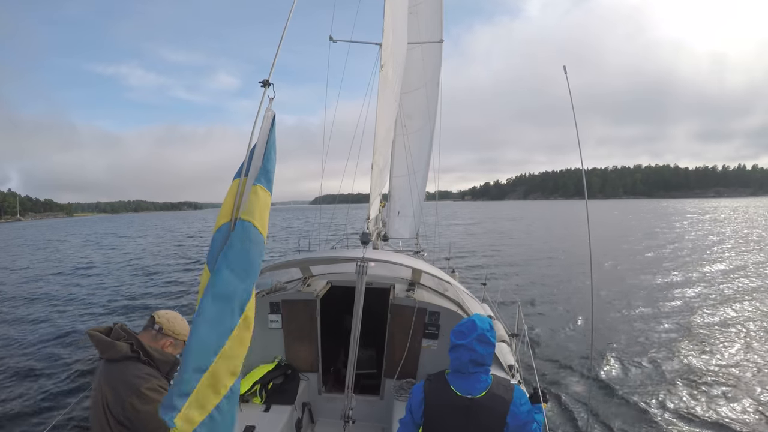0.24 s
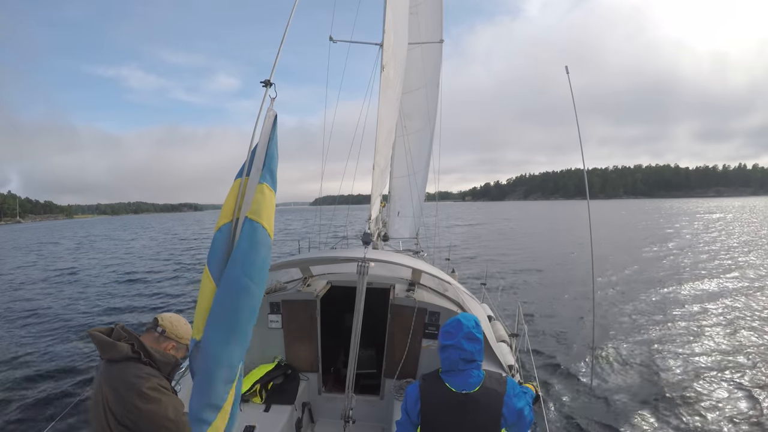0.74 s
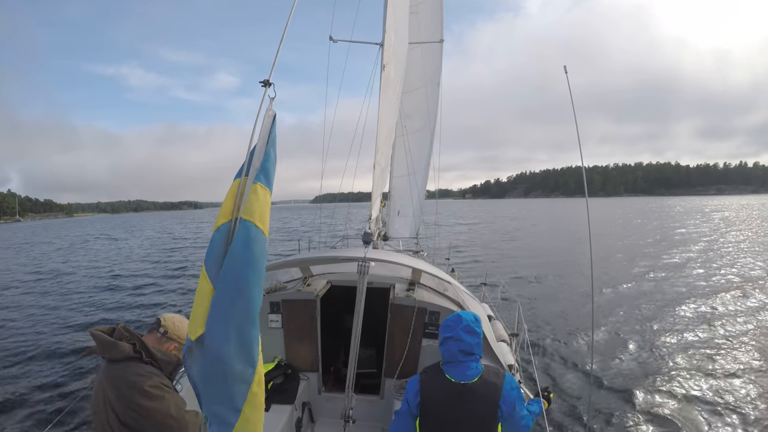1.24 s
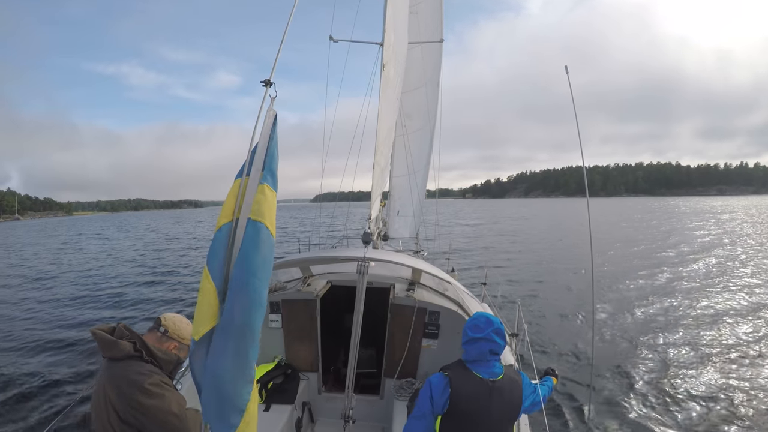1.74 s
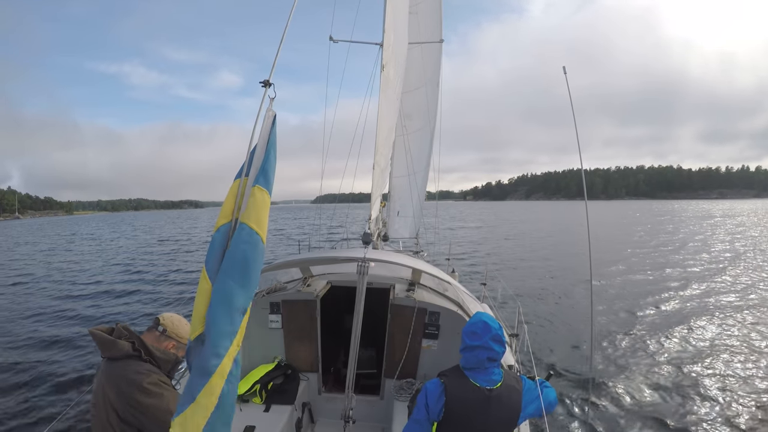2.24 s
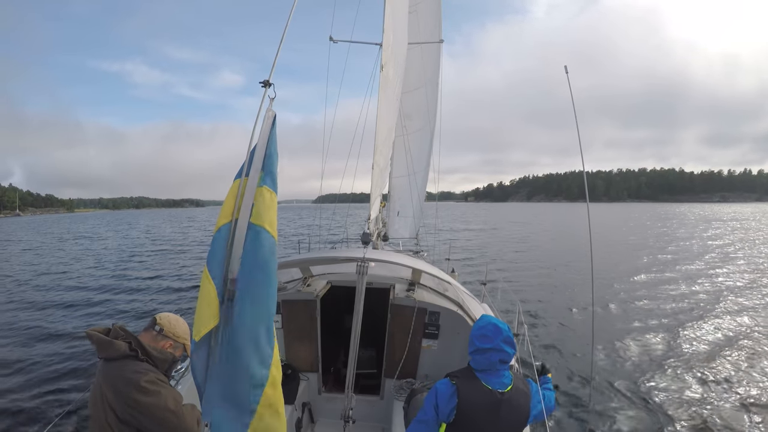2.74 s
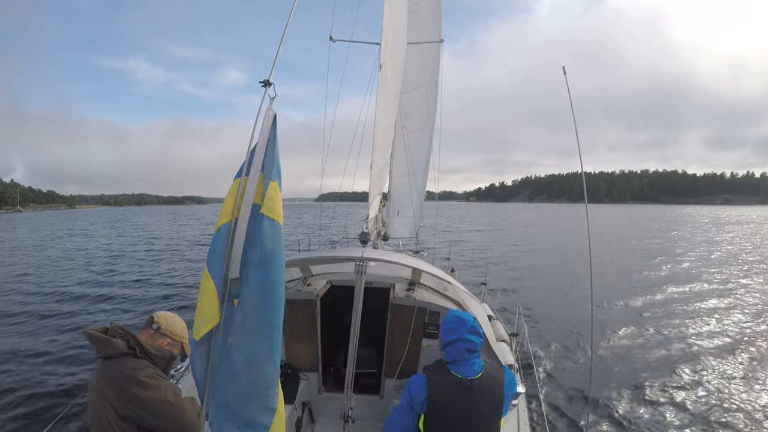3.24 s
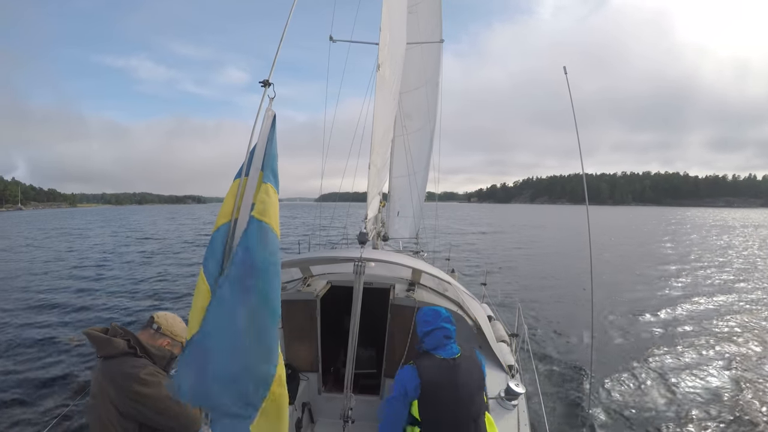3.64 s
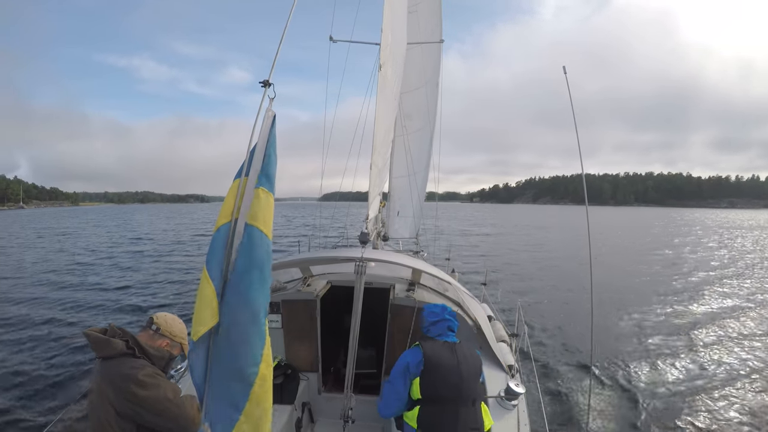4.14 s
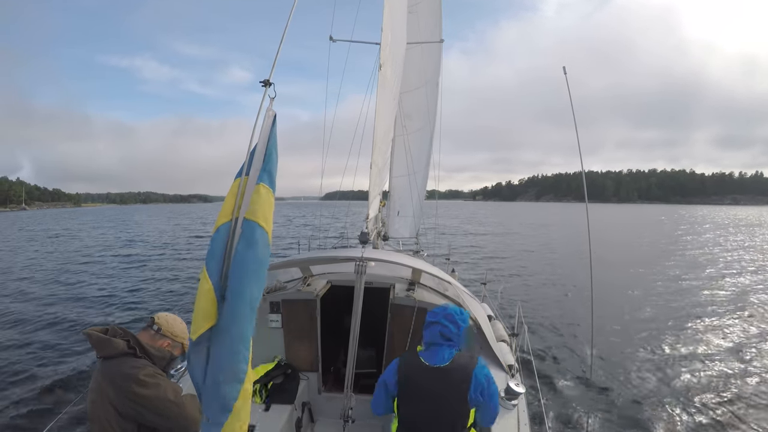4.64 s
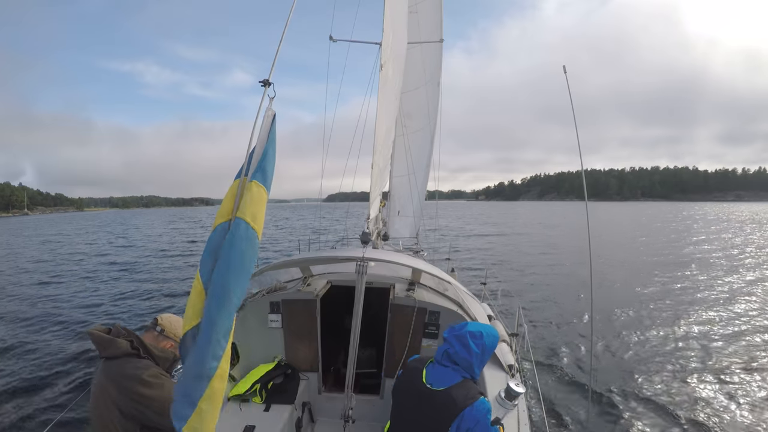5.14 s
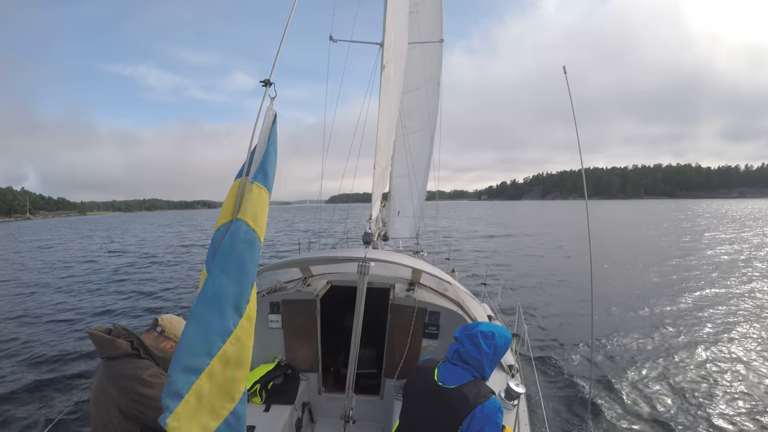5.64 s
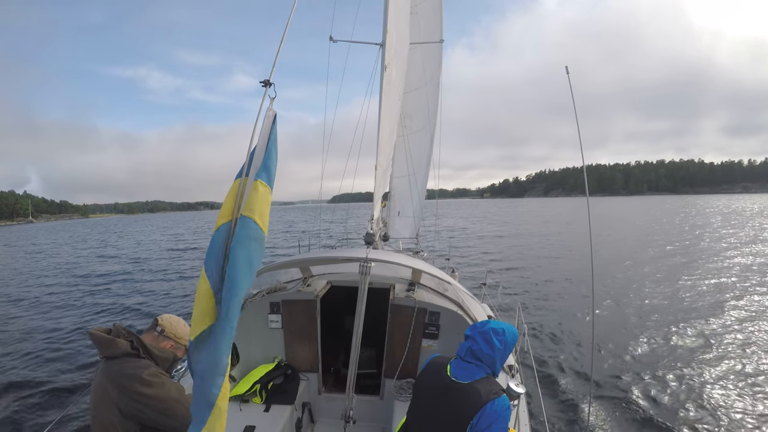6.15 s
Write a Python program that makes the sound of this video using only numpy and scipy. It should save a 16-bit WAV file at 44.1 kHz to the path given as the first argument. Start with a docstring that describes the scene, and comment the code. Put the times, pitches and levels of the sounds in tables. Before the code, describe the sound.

Light chop slaps the hull of a small sailing boat in hollow, slightly ringing knocks. They come in quick clusters during the first three seconds, then thin out, with the hardest slap a little after four seconds. Underneath, a low wind rumble and hum swell and fade, with a few dull thuds and the soft gurgle and splash of the wake. The microphone sits on a pole at the stern, and everything sounds boxy and muffled.

```python
"""Hollow, ringing knocks over a low drone and gurgling water: a small yacht sailing in light chop,
heard from a housed camera on a pole at the stern. Wavelets slap the hull, each trapping a pocket
of air; the knocks travel up the pole and ring it. Wind keeps the pole swaying and heavy waves set
it humming, while the bubbles of the wake gurgle and splash alongside."""
import sys
import numpy as np
from scipy import signal
from scipy.fft import rfft, irfft, next_fast_len
from scipy.io import wavfile
from scipy.ndimage import uniform_filter1d, map_coordinates

SR = 44100
rng = np.random.default_rng(int(sys.argv[2]) if len(sys.argv) > 2 else 0)


def generate_wav(sig):
    """Save sig (samples, or channels by samples) to the path in sys.argv[1] as 16-bit PCM at SR."""
    pcm = np.round(np.clip(np.atleast_2d(sig).T, -1, 1) * 32767).astype(np.int16)
    wavfile.write(sys.argv[1], SR, pcm)


N = 281799
TIME = np.arange(N) / SR

# hull slaps: t/s, level/dB, pocket f/Hz, pocket life/s, hollow, clack, spit/dB re core (before trim)
SLAPS = [(.002, -39.5, 706, 0.0021, 6.5, -1.5, -9), (.1128, -29, 854, 0.0054, -19, -21, -26),
         (.170, -40.5, 820, 0.0045, -8, -5.5, -11.5), (.346, -40.5, 900, 0.0036, -21, 1, -29),
         (0.62, -44, 1080, 0.012, -12, 0.5, -32), (0.6703, -38.5, 912, 0.0043, -16, -8, -20),
         (.858, -51, 1300, 0.0073, -3.5, -7, -26), (.932, -36, 1116, 0.011, -14.5, -3, -21),
         (0.972, -28, 877, 0.012, -35, -11.5, -34), (.9915, -33, 1107, 0.0086, -12.5, -4, -31),
         (1.146, -27, 892, 0.0064, -13, -3, -21.5), (1.2237, -42.5, 737, 0.0076, -15, -7, -27),
         (1.383, -22.5, 1090, 0.0043, -8.5, -14.5, -21.5), (1.4328, -25, 1113, 0.0045, -12, -23, -35),
         (1.4607, -26, 963, .0034, -16.5, -17, -17), (1.479, -25, 1107, 0.0024, -13.5, -36, -33.5),
         (1.529, -23.5, 1120, 0.0054, -6, -20, -17), (1.585, -25, 1137, 0.0053, -8, -22, -25),
         (1.605, -37, 830, .006, -2.5, -11, -7), (1.7593, -15, 880, 0.0046, -0.5, -7, -20.5),
         (2.026, -47, 1080, 0.0024, -7.5, -3, -17), (2.162, -42.5, 830, 0.0062, -8.5, -2.5, -25),
         (2.362, -46, 1067, 0.013, -13, -16, -34), (2.5737, -44, 880, 0.0015, -1, -12, -25),
         (2.6, -31.5, 875, .004, -10, -10, -11.5), (2.615, -30.5, 927, 0.0036, -14, -17, -22),
         (2.663, -30, 868, 0.0056, -10, -22, -30), (2.688, -38.5, 906, 0.014, -10, -5, -31),
         (2.718, -28.5, 1103, 0.0052, -10.5, -8.5, -19), (3.163, -46.5, 1105, .008, -4.5, -11.5, -17),
         (3.246, -49, 870, 0.0033, -19, -7, -23), (3.624, -47, 1096, 0.014, 5, -8, -16),
         (4.2529, -11, 1062, 0.0051, -24.5, -8, -24.5), (4.4263, -28.5, 832, 0.011, -0.5, -8, -14),
         (4.613, -31, 1070, 0.0037, -5, -8.5, -35), (5.444, -56, 847, 0.026, 6.5, 3.5, -9),
         (6.0669, -50.5, 1166, .017, 7, -0.5, -4)]
# waves under the stern: t/s, level/dB, f/Hz, pole hum/dB re shove
SHOVES = [(0.013, -29.5, 104, 7), (1.166, -31, 93, 7), (1.429, -22.5, 76, 1), (1.55, -33.5, 111, 15.5),
          (1.786, -23.5, 101, 1.5), (2.601, -47, 101, 16), (2.751, -43.5, 99, 12.5),
          (3.638, -21, 88.3, -4.5), (4.278, -34.5, 107, 3)]
# wake splashes: crest t/s, level/dB, half length/s, slosh f/Hz, fizz/dB re splash
SPLASHES = [(0.324, -48.5, 0.037, 1050, -19), (0.493, -54, 0.03, 795, -25),
            (1.138, -36.5, .0048, 1110, -38), (1.342, -42, 0.021, 960, -34),
            (2.736, -52.5, 0.01, 1510, 2.5), (2.958, -65, 0.01, 1610, 8), (3.088, -50.5, 0.077, 600, -19),
            (3.586, -47.5, .021, 1185, -13), (4.347, -38.5, .018, 1050, -20), (4.86, -42, .03, 1130, -14.5),
            (4.918, -47, 0.026, 1680, -10.5), (5.198, -55.5, .045, 498, -17), (5.45, -53, 0.058, 790, -21),
            (5.606, -63.5, 0.06, 1590, -5.5), (6.17, -48.5, 0.03, 635, -43)]


def amp(db):
    """Decibels to gain."""
    return 10 ** (np.asarray(db) / 20)


def unit(x):
    """Scale to rms 1."""
    return x / np.sqrt(np.mean(x ** 2) + 1e-20)


def unit_burst(x):
    """Scale the loudest 15 ms to rms 1."""
    return x / np.sqrt(uniform_filter1d(x ** 2, 660).max() + 1e-20)


def wobble(rate_hz):
    """Smooth random curve, rate_hz knots a second."""
    return map_coordinates(rng.standard_normal(N // 100), [TIME * rate_hz], mode="wrap")


def add(track, at_s, sound):
    """Mix a sound into the track."""
    start = max(0, round(at_s * SR))
    track[start:start + len(sound)] += sound[:N - start]


def colour(spectrum, size=8192):
    """Minimum-phase impulse response from rows of f/Hz, level/dB."""
    hz, db = np.transpose(spectrum)
    gain = amp(np.interp(np.log(np.fft.rfftfreq(size, 1 / SR) + 1), np.log(hz), db))
    cepstrum = irfft(np.log(gain))[:size // 2]
    cepstrum[0] /= 2
    return irfft(np.exp(rfft(2 * cepstrum, size)))


def through(x, response):
    """Convolve, keeping the length of x."""
    return signal.fftconvolve(x, response)[:len(x)]


def noise(spectrum):
    """Coloured noise, rms 1."""
    return unit(through(rng.standard_normal(N), colour(spectrum)))


def hiss(level_db=-65):
    """Faint, even hiss."""
    # f/Hz, level/dB
    spectrum = [(200, 4), (1000, 12), (2500, 6.5), (4000, 5), (5600, 2), (8000, -1), (11000, -3.5),
                (15000, -3.5)]
    return amp(level_db) * noise(spectrum)


def ring_down(kicks, t60_s, rise_s):
    """Envelope of a mode that gathers the energy of each kick (t/s, level/dB) and slowly loses it."""
    energy, t = np.zeros(N), np.arange(SR) / SR
    shape = (1 - np.exp(-t / rise_s)) * amp(-60 * t / t60_s)
    for at_s, db in kicks:
        add(energy, at_s, (amp(db) * shape / shape.max()) ** 2)
    return np.sqrt(energy)


def driven_mode(hz, wander_hz, rate_hz, flutter_db=3):
    """Randomly driven mode: pitch and strength waver."""
    phase = 2 * np.pi * np.cumsum(hz + wander_hz * wobble(rate_hz)) / SR
    return unit(np.sin(phase) * amp(flutter_db * wobble(rate_hz)))


def pole(hum_rest_db=-53, rumble_db=-43.5):
    """Wind rumbles past and, with shoves, sways the first mode; all wave impacts kick the second."""
    # wind-driven sway: t/s, level/dB
    wind = [(0, -39), (.55, -40.5), (.8, -54), (1.1, -24.5), (1.27, -32), (1.95, -35), (2.36, -39),
            (2.52, -47.5), (2.8, -32.5), (3.5, -48.5), (3.88, -23), (4.13, -46), (4.92, -35.5),
            (5.08, -45.5), (5.39, -36), (5.78, -34), (5.93, -42.5), (6.39, -32)]
    wind_db = np.interp(TIME, *np.transpose(wind))
    sway_kicks = [(at_s, db - 3.5) for at_s, db, *_ in SHOVES]
    hum_kicks = [(at_s, db + hum_db) for at_s, db, _, hum_db in SHOVES]
    hum_kicks += [(at_s, -13.5 + 0.69 * (db + hollow_db)) for at_s, db, _, _, hollow_db, _, _ in SLAPS]
    hum_kicks += [(at_s, db + 6.5) for at_s, db, *_ in SPLASHES]
    sway_gain = np.hypot(amp(wind_db), ring_down(sway_kicks, t60_s=0.94, rise_s=0.0054))
    hum_gain = np.hypot(amp(hum_rest_db), ring_down(hum_kicks, t60_s=0.58, rise_s=0.013))
    sway = sway_gain * driven_mode(hz=64.3, wander_hz=2.746, rate_hz=16)
    hum = hum_gain * driven_mode(hz=123.14, wander_hz=4.59, rate_hz=19)
    # f/Hz, level/dB
    rumble_spectrum = [(10, -22.5), (25, -4), (38, -1), (55, -1), (90, -5), (135, -6), (175, -27.5),
                       (400, -37), (1500, -91.5)]
    rumble = amp(rumble_db + 0.25 * (wind_db - wind_db.mean())) * noise(rumble_spectrum)
    return sway + hum + rumble


def hull_and_pole():
    """Impulse response of the boat: the direct blow plus ringing modes."""
    # f/Hz, gain at resonance/dB, t60/s
    modes = [(270, 4, 0.24), (490, 10.5, 0.068), (598, 11, .16), (724, 9, 0.45), (880, 12.5, 0.24),
             (843, 9, 0.055), (1080, 7.5, 0.03), (1235, 7.5, 0.27), (1270, 8, 0.12), (1550, 0.5, 0.14),
             (1740, 9.5, 0.033), (1837, 7.5, 0.12), (2150, 7.5, 0.029), (2374, 6, 0.041), (2738, 6.5, .05),
             (3284, 8.5, 0.094), (5400, 12, 0.0089)]
    t = np.arange(SR // 3) / SR
    response = signal.unit_impulse(len(t))
    for hz, db, t60_s in modes:
        decay = np.log(1000) / t60_s
        response += (amp(db) - 1) * 2 * decay / SR * np.exp(-decay * t) * np.cos(2 * np.pi * hz * t)
    return response


def bubbles(per_s, centre_hz, spread, cycles, size_db, glide):
    """Swarm of short bubbles, each rising in pitch as it dies."""
    count = int(per_s * N / SR)
    t = np.arange(int(4 * SR * cycles / centre_hz)) / SR
    start = rng.integers(0, N, (count, 1))
    hz = np.clip(centre_hz * np.exp(spread * rng.standard_normal((count, 1))), 200, 9000)
    age = hz * t / cycles
    size = amp(size_db * np.minimum(rng.exponential(size=(count, 1)), 3))
    phase = 2 * np.pi * hz * t * (1 + glide * np.minimum(age, 2))
    rings = size * age * np.exp(-3 * age) * np.sin(phase)
    return unit(np.bincount((start + np.arange(len(t))).ravel(), rings.ravel(), N)[:N])


def water(spectrum, body, swarm, swarm_db):
    """Bubbles on a bed of foam noise, heard through the boat."""
    source = rng.standard_normal(N) + amp(swarm_db) * swarm
    return unit(through(through(source, colour(spectrum)), body))


def wake(body, foam_db=-5, slosh_db=-2.5, deep_hz=580):
    """The wake gurgles throughout and at times breaks into a sloshing, fizzing splash."""
    # wake strength: t/s, level/dB
    strength = [(0.0, -45.5), (0.67, -71.5), (0.91, -60), (1.07, -62.5), (1.21, -63), (1.46, -45.5),
                (1.89, -59.5), (2.17, -64.5), (2.46, -61), (2.63, -60.5), (3.26, -57.5), (3.92, -69.5),
                (4.22, -63.5), (4.45, -48.5), (4.63, -62.5), (4.88, -60), (5.91, -63), (6.39, -60.5)]
    # spectra of the three water layers: f/Hz, level/dB
    gurgle_spectrum = [(100, -35.5), (170, -3), (270, 2), (380, -16.5), (600, -13.5), (800, -21.5),
                       (1300, -49), (4000, -71.5)]
    wash_spectrum = [(350, -45.5), (650, 2.5), (950, -1.5), (1400, -2.5), (1850, -4.5), (2300, -18.5),
                     (3500, -27), (6000, -29.5), (14000, -41)]
    fizz_spectrum = [(1200, -22.5), (2200, 1.5), (3400, 3.5), (4600, -6), (5500, -7), (6400, -10.5),
                     (9000, -16.5), (14000, -28)]
    wake_db = np.interp(TIME, *np.transpose(strength))
    foam, spray, slosh, stir = np.zeros((4, N))
    t = np.arange(SR // 2) / SR
    for crest_s, db, half_s, hz, fizz_db in SPLASHES:
        lead_s = 3 * half_s
        start_s = crest_s - lead_s
        swell = amp(db) * np.exp(-0.5 * ((t - lead_s) / half_s) ** 2)
        add(foam, start_s, swell * amp(foam_db))
        add(spray, start_s, swell * amp(fizz_db))
        # the air cloud under the crest resonates as a whole; a large, low one stirs up the gurgle
        cloud_band = signal.butter(2, [hz - hz / 9, hz + hz / 9], "band", fs=SR, output="sos")
        cloud = unit(signal.sosfilt(cloud_band, rng.standard_normal(len(t))))
        add(slosh, start_s, swell * amp(slosh_db) * cloud)
        add(stir, start_s, swell * amp(-1) * min(1, deep_hz / hz) ** 4)
    large = bubbles(per_s=220, centre_hz=564, spread=0.25, cycles=5.8, size_db=4, glide=0.027)
    gurgle = water(gurgle_spectrum, body, large, swarm_db=-15.5)
    medium = bubbles(per_s=280, centre_hz=1217, spread=0.45, cycles=9.7, size_db=5, glide=0.12)
    wash = water(wash_spectrum, body, medium, swarm_db=-9.5)
    fine = bubbles(per_s=2700, centre_hz=4500, spread=0.36, cycles=3, size_db=15, glide=0.03)
    fizz = water(fizz_spectrum, body, fine, swarm_db=-24)
    gurgle_gain = amp(wake_db - 3 + 4.5 * wobble(rate_hz=10))
    wash_gain = amp(wake_db - 4 + 3 * wobble(rate_hz=14))
    return np.hypot(gurgle_gain, stir) * gurgle + np.hypot(wash_gain, foam) * wash + slosh + spray * fizz


def shoves(swell_s=0.008, thud_db=-19, thud_t60_s=0.2):
    """A heavy wave gives the stern a soft, deep push of a few cycles and a dull thud."""
    # f/Hz, level/dB
    thud_spectrum = [(70, -21.5), (170, 4), (250, 0), (420, -25), (1500, -72)]
    out, t = np.zeros(N), np.arange(SR // 3) / SR
    dull = colour(thud_spectrum)
    for at_s, db, hz, _ in SHOVES:
        push = unit_burst(t ** 2 * np.exp(-t / swell_s) * np.sin(2 * np.pi * hz * t))
        thud = unit_burst(through(amp(-60 * t / thud_t60_s) * rng.standard_normal(len(t)), dull))
        add(out, at_s - swell_s, amp(db) * (push + amp(thud_db) * thud))
    return out


def slaps(body, lead_s=0.00045, attack_s=0.0013, boom_db=-17, boom_rise_s=0.01, boom_t60_s=0.19,
          violent_db=-15, overload_db=-6):
    """Each slap is a swelling blow with scattered after-knocks, plus the brief ring of trapped air."""
    # spectra of the blow and the panel boom: f/Hz, level/dB
    knock_spectrum = [(120, -16.5), (280, -3.5), (390, -9.5), (530, -6.5), (950, 9), (1350, 0.5),
                      (1800, -9), (2300, -16.5), (3200, -20), (4200, -31.5), (6000, -47.5), (9000, -59.5),
                      (15000, -75)]
    boom_spectrum = [(100, -28.5), (190, 7.5), (270, 5.5), (380, -11.5), (550, 2.5), (800, 3), (1200, -19),
                     (2000, -18.5), (5000, -54)]
    # edges of the hollow, core, clack and spit bands: f/Hz
    edges_hz = [170, 700, 1400, 2300, 15500]
    # after-knocks per band: level/dB, t60/s
    after_knocks = [(-5.4, 0.13), (-4, 0.094), (-4, 0.082), (-1, 0.072)]
    # clear ring of the pole: f/Hz, level/dB re a slap at violent_db, t60/s
    pole_modes = [(249, -28, 0.45), (283.6, -25, 0.48), (597, -20.5, 0.21), (1798, -14, 0.13),
                  (1888, -19, 0.12), (1900, -16.5, 0.18), (2185, -17.5, 0.057), (3207, -18.5, 0.041)]
    out, t = np.zeros(N), np.arange(SR // 4) / SR
    tone = lambda hz: np.sin(2 * np.pi * hz * t)
    rise = (1 - np.exp(-t / attack_s)) ** 2
    direct = colour(knock_spectrum)
    hull = through(body, direct)
    bands = [signal.butter(3, pair, "band", fs=SR, output="sos") for pair in zip(edges_hz, edges_hz[1:])]
    paths = [signal.sosfilt(band, route) for band, route in zip(bands, [direct, hull, hull, hull])]
    tails = [rise * amp(db - 60 * t / t60_s) for db, t60_s in after_knocks]
    panels = through(body, colour(boom_spectrum))
    boom_shape = (1 - np.exp(-t / boom_rise_s)) * amp(-60 * t / boom_t60_s)
    for at_s, db, hz, life_s, hollow_db, clack_db, spit_db in SLAPS:
        small_hz = 1583 * np.exp(0.04 * rng.standard_normal())
        push = rise * np.exp(-t / life_s)
        push /= push.max()
        forces = [np.hypot(push, tail) * rng.standard_normal(len(t)) for tail in tails]
        hollow, core, clack, spit = [unit_burst(through(f, path)) for f, path in zip(forces, paths)]
        # the trapped air splits into three pockets; the main one beats
        main_pocket = unit_burst(push * (tone(hz) + amp(-10) * tone(0.89 * hz)))
        large_pocket = unit_burst(push * tone(0.72 * min(hz, 880)))
        small_pocket = unit_burst(push * tone(small_hz))
        core = unit_burst(amp(-4) * core + main_pocket)
        hollow = unit_burst(hollow + amp(2) * large_pocket)
        clack = unit_burst(clack + amp(-3) * small_pocket)
        # the flatter the water lands, the more it clacks and spits
        knock = core + amp(hollow_db + 1.5) * hollow
        knock += amp(clack_db + 0.5) * clack + amp(spit_db + 2.5) * spit
        # hull panels take up the blow slowly and boom on
        boom = amp(boom_db) * unit_burst(through(boom_shape * rng.standard_normal(len(t)), panels))
        ring = rise * sum(amp(mode_db + rng.normal(0, 0.4) - 60 * t / t60_s) * tone(mode_hz)
                          for mode_hz, mode_db, t60_s in pole_modes)
        add(out, at_s - lead_s, amp(db) * (knock + boom + amp(db - violent_db) * ring))
        # a short, sharp click imitates the hardest slaps overloading the camera
        click = amp(3 * (db - overload_db)) * np.hanning(7) / 2
        add(out, at_s + 2 * attack_s, click)
    return out


def scene():
    """Slaps, shoves, pole drone and wake over hiss; mono."""
    body = hull_and_pole()
    return (slaps(body) + shoves() + pole() + wake(body) + hiss())[None]


def record(dry):
    """The camera clips on overload and keeps nothing above its band limit."""
    full_scale, top_hz = 0.9, 15200
    clipped = np.clip(dry, -full_scale, full_scale)
    size = next_fast_len(N + SR // 4)
    passband = np.fft.rfftfreq(size, 1 / SR) < top_hz
    return irfft(rfft(clipped, size) * passband, size)[:, :N]


dry = scene()
out = record(dry)
generate_wav(out)
```